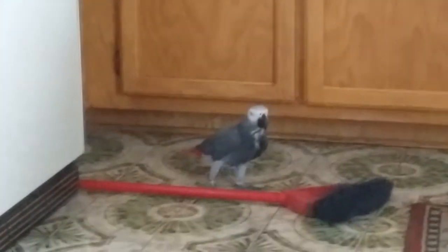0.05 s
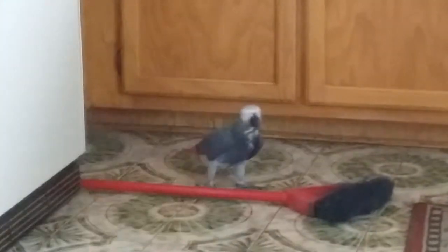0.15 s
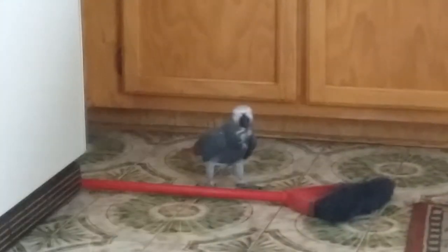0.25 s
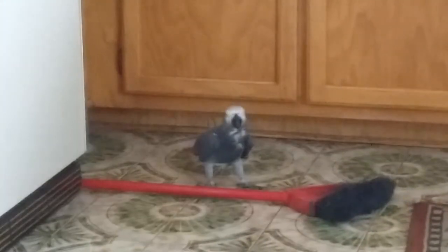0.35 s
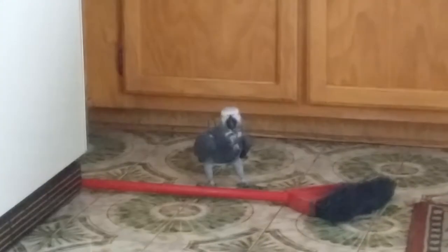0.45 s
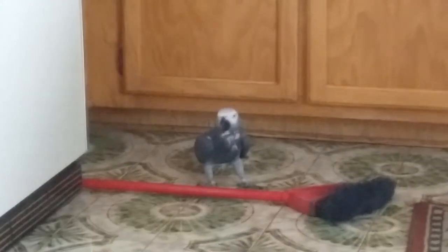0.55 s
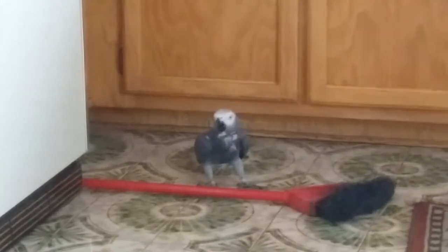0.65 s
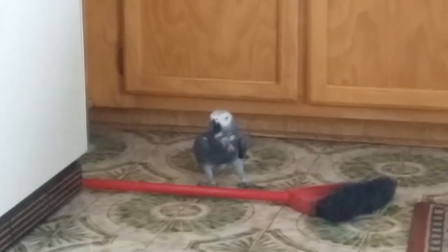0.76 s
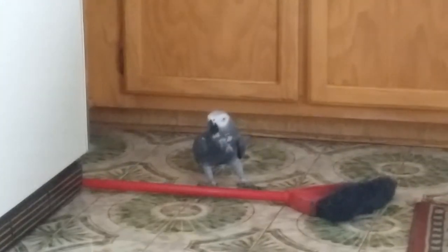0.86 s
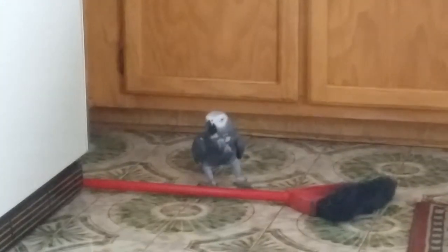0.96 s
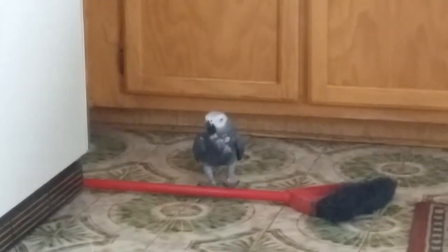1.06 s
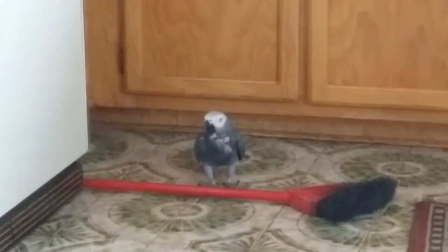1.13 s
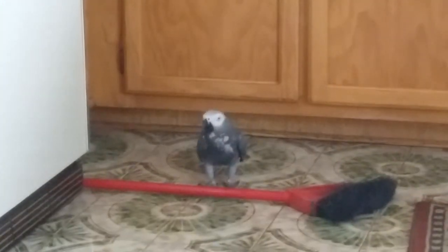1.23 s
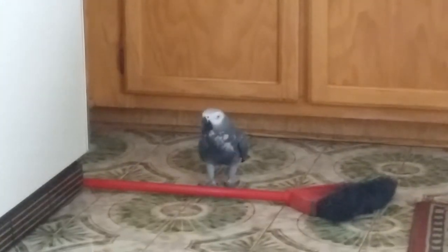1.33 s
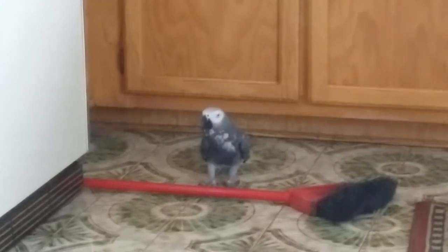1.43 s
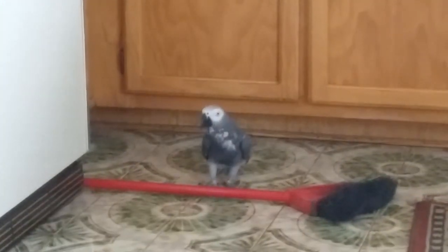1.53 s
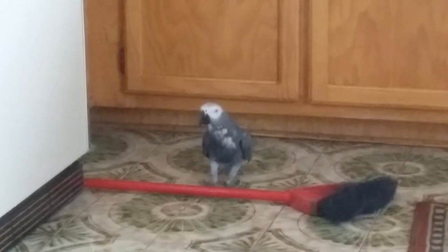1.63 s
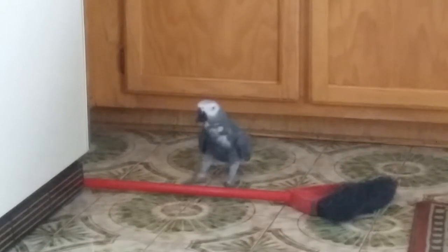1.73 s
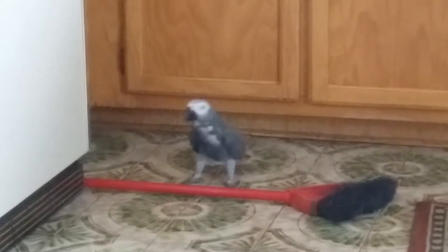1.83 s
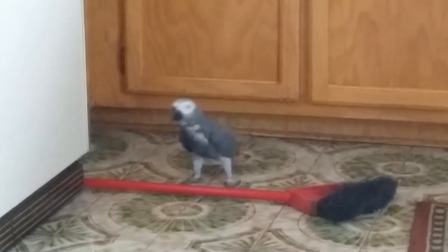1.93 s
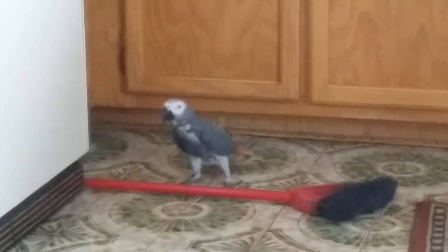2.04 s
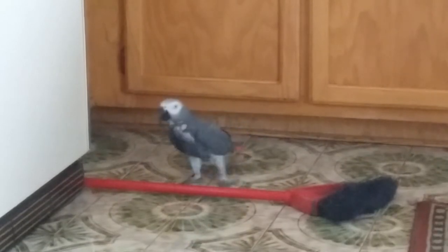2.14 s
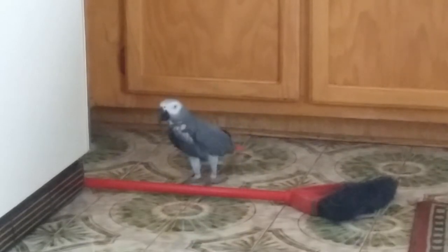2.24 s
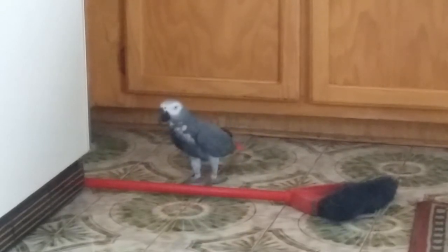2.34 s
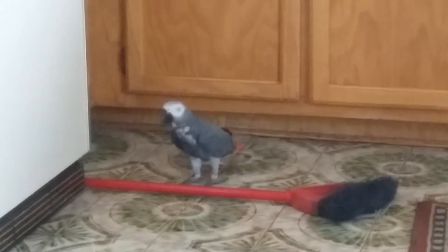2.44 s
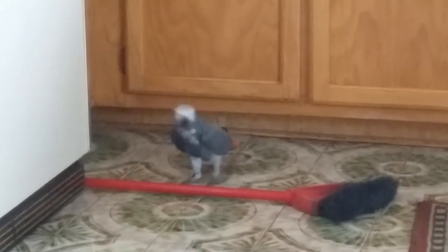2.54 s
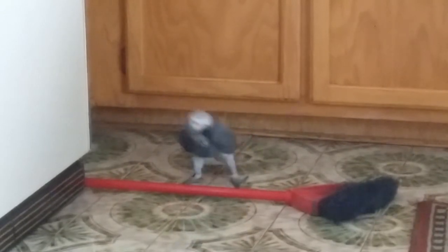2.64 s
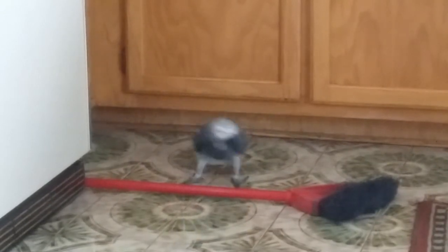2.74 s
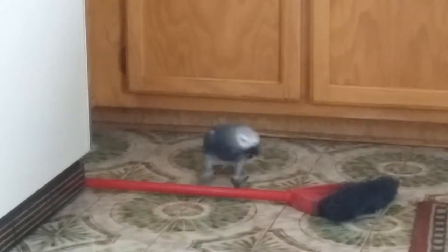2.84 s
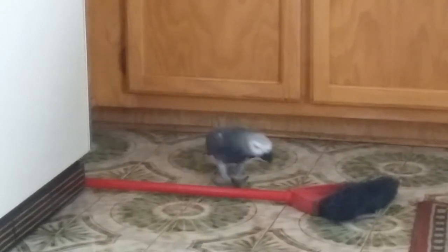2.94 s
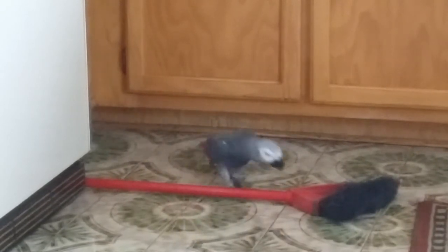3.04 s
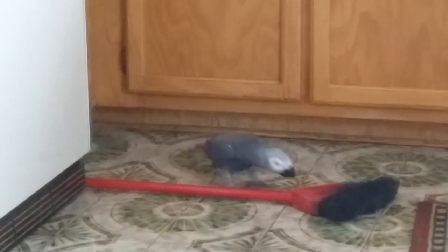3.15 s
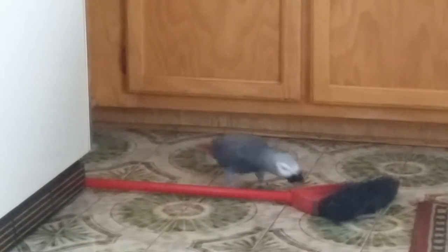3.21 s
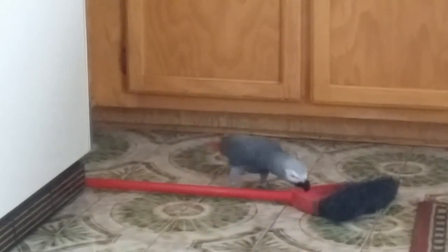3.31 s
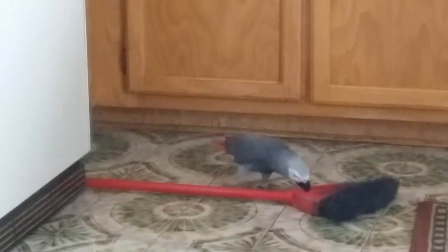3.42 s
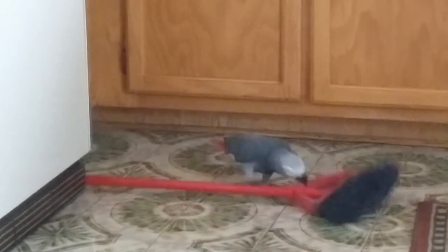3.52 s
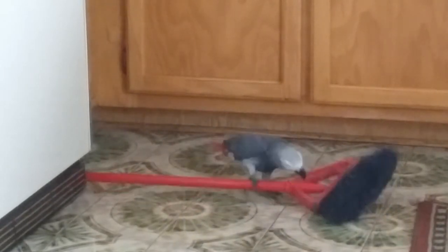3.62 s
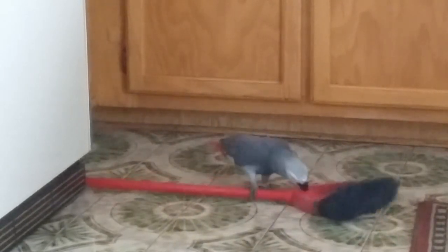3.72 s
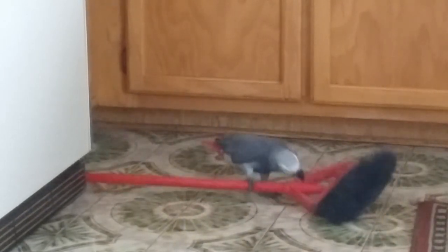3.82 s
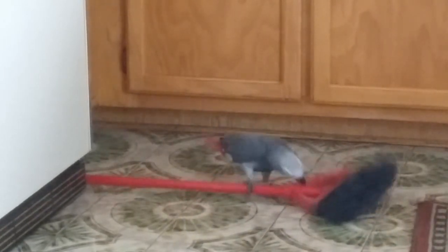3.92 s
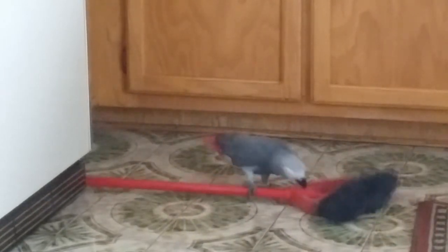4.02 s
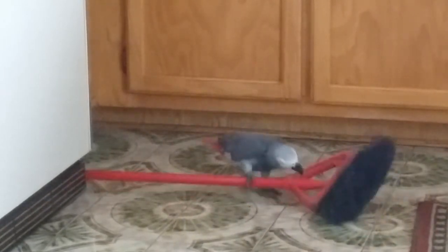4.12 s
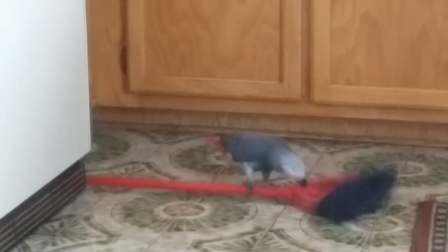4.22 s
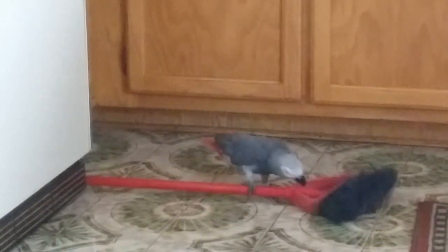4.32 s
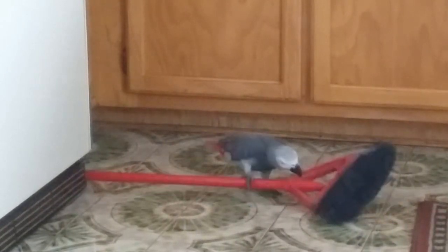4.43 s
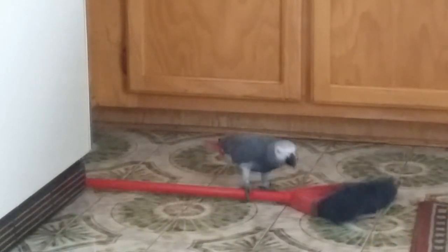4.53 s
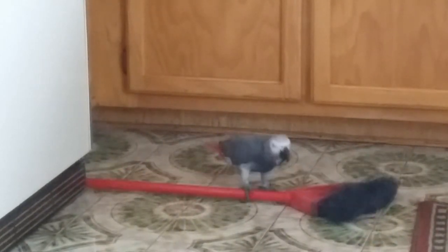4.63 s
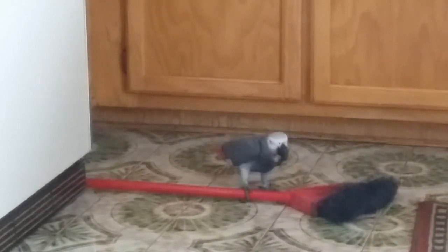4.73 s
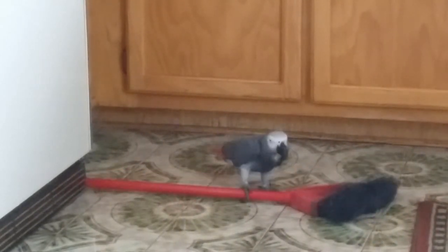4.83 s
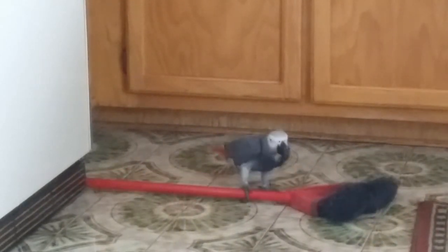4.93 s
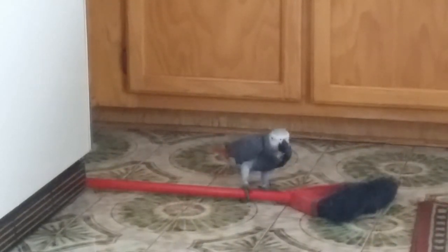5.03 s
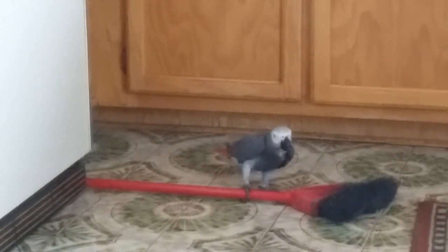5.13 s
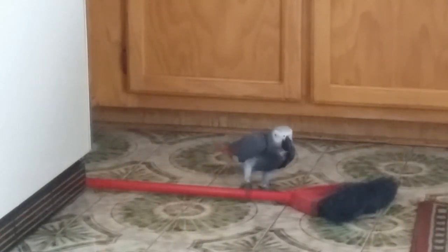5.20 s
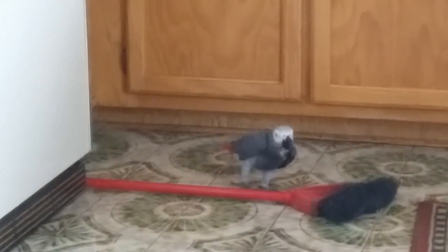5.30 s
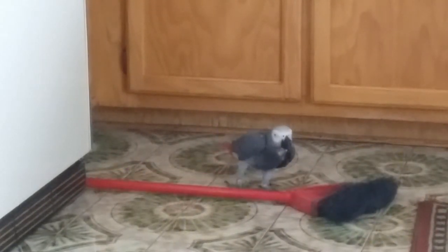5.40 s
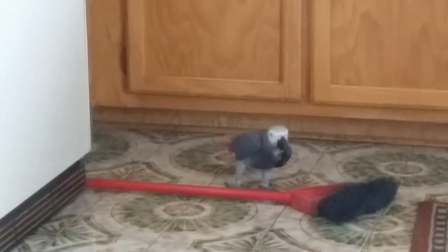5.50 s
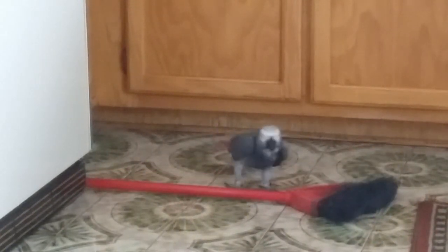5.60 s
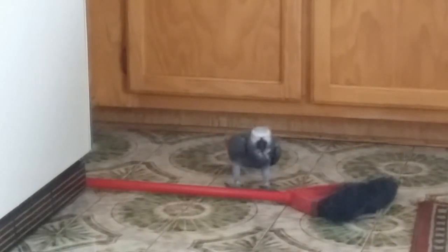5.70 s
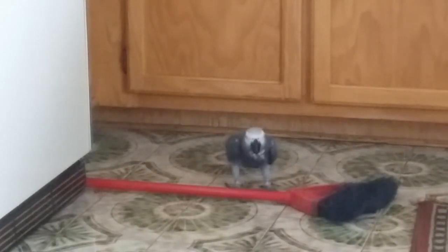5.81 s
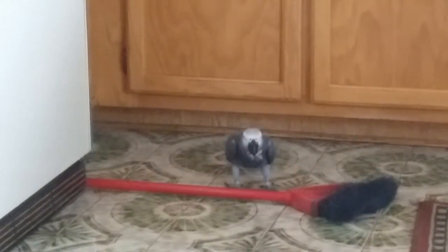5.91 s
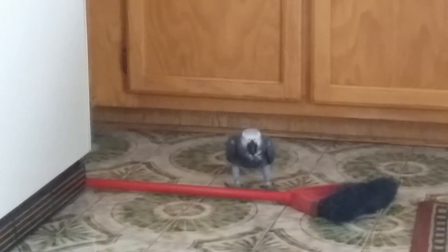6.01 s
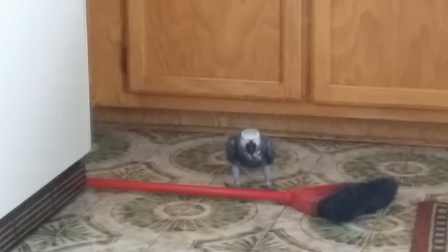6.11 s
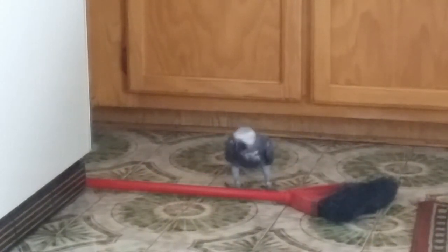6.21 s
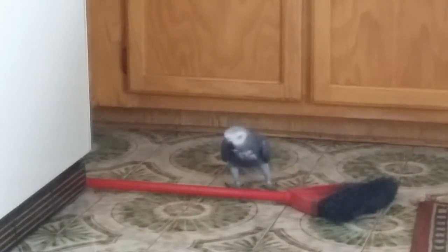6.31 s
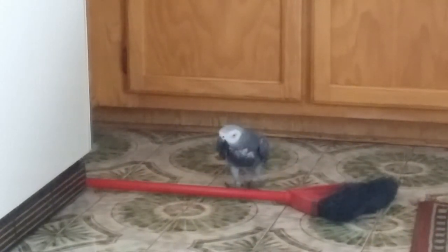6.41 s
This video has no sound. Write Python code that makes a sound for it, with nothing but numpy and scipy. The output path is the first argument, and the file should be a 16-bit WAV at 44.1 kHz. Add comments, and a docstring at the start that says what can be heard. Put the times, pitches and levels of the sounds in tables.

```python
"""Parrot and broom on a kitchen floor

Place: a hard-walled kitchen, where a parrot on the floor pecks and tugs at a plastic broom: a rattle, then
four loud knocks, each a dull modal thump and a sharp modal crack, sent through the room's reflections.
Before that, light clinks ring across the room and dry ticks, with no room on them, sit near the microphone.
Sine tones and shaped noise make the appliance hum and hiss; the gain control ducks and slowly recovers."""
import sys
import numpy as np
from scipy import signal
from scipy.fft import rfft, irfft
from scipy.io import wavfile
from scipy.ndimage import uniform_filter1d, minimum_filter1d

SR = 44100
rng = np.random.default_rng(int(sys.argv[2]) if len(sys.argv) > 2 else 0)


def master(y):
    """Save y as 16-bit WAV."""
    cut = np.clip(np.atleast_2d(y).T, -1, 1)
    pcm = np.round(cut * 32767)  # scale
    wavfile.write(sys.argv[1], SR, pcm.astype(np.int16))


N = 284797

# shapes of the background noise: [f/Hz, relative power density/dB]
RUMBLE_SPECTRUM = [(18, -74), (30, -42), (40, -26), (54, -19.5), (113, -4.5), (147, -7.5), (177, -0.5),
                   (249, -7), (281, -8), (360, -11), (395, -5.5), (498, -17), (732, -13.5), (937, -17.5),
                   (1200, -30.5), (1560, -63), (2640, -120)]
HISS_SPECTRUM = [(590, -43), (1000, -21), (1140, -6), (2100, -6), (2300, -8), (2850, -8.5), (3830, -10.5),
                 (4580, -10), (4790, -5.5), (5250, -4), (6010, 2), (7610, -13), (12100, -23), (14000, -29),
                 (14800, -27)]
# steady appliance tones: [f/Hz, middle level/dB]
HUM_TONES = [(120.3, -56), (177.4, -54), (279.9, -57), (328.4, -58.5), (4950, -64)]
# decay of the kitchen: [f/Hz, t60/s, tail level/dB]
ROOM_DECAY = [(150, 0.89, 9), (530, 0.77, 12), (1400, 0.66, 11.5), (3400, 0.69, 13), (5660, 0.66, 11),
              (9700, 0.54, 18), (14200, 0.28, 9)]
# first wall echoes after the direct sound: [t/s, level before the low-pass/dB]
WALL_ECHOES = [(.0072, -14), (0.0183, -5.5), (0.0204, -8), (.0450, -7.5)]
# narrow resonances that ring in every tail: [f/Hz, level/dB]
RINGING_MODES = [(772, -49), (960, -51), (1197, -62), (1584, -50), (1642, -46), (1848, -65), (2110, -61),
                 (2176, -62), (2401, -55), (2767, -53), (2920, -56), (4320, -54), (5817, -59), (6360, -47)]
# dry ticks close to the microphone: [t/s, peak level before the low-pass/dB, number of contacts]
TICK_TIMES = [(0.0193, -18, 1), (0.1711, -11.5, 1), (0.463, -11, 4)]
# modes of a tick: [f/Hz, width/Hz, relative level/dB]
TICK_MODES = [(1970, 900, -24), (3670, 7400, 18), (6100, 3000, 23), (8800, 3000, -15)]
# clinks across the room: [t/s, ring level/dB, snap level/dB, brightness/(dB per octave)]
CLINK_TIMES = [(1.206, -53, -25.5, 5.5), (1.336, -36, -24.5, -2), (1.606, -39, -46, -18),
               (1.704, -27, -25.5, -1), (1.927, -30.5, -18.5, 2), (1.955, -32, -20, 2),
               (2.042, -22, -6.5, 1), (2.413, -36.5, -24.5, 11), (2.593, -42, -30, -5),
               (2.666, -45, -26.5, 10), (2.890, -32, -29, 0)]
# low and high modes of what clinks: [f/Hz, width/Hz, relative level/dB]
CLINK_RING_MODES = [(1270, 98, -6.5), (1480, 37, -0.5), (2380, 870, -11.5), (3200, 61, 5), (4320, 89, 0)]
CLINK_SNAP_MODES = [(2960, 820, -13), (4650, 230, -2), (5190, 216, 1.5), (5900, 294, 1), (6770, 670, -5),
                    (7440, 255, -7), (8230, 510, -17), (9160, 280, -24.5), (10870, 370, -19),
                    (11450, 400, -22.5), (12530, 400, -21)]
# beak on broom, levels before low-pass and room: [t/s, thump level/dB, thump f/Hz, crack level/dB]
PECK_TIMES = [(3.601, -44, 1000, -20.5), (3.6245, -38, 750, -13), (3.646, -29.5, 536, -33),
              (3.8165, -8.5, 1163, -5), (4.0727, -2.5, 1480, -3), (4.203, -21.5, 790, -18),
              (4.3560, 3.5, 1900, 5), (4.6257, 0.5, 2100, 5)]
# modes of the floor, of the hollow broom head and of its hard rim: [f/Hz, width/Hz, relative level/dB]
FLOOR_MODES = [(118, 35, -5.5), (215, 65, -3.5), (540, 266, -2), (798, 206, 0), (1018, 140, -1),
               (1171, 187, -1.5)]
SHELL_MODES = [(1315, 200, -6.5), (1600, 460, -1.5), (2150, 550, 3), (2466, 420, 3), (2926, 340, 2.5),
               (3670, 670, -0.5), (4410, 420, 2.5), (4890, 680, 0)]
RIM_MODES = [(5890, 413, 1), (6110, 300, 1), (6303, 380, -1), (7280, 2800, -19), (8740, 490, -16.5)]

# background levels, rms
RUMBLE_DB, HISS_DB = -40.71, -43.5
# gap and loss from one contact of a tick to the next, then the stretch and level of the faint patter
CHATTER_S, CHATTER_LOSS_DB = 0.004, 5
PATTER_FROM_S, PATTER_TO_S, PATTER_DB = 0.033, 0.15, -23
# the ring is duller than the snap (dB per octave) and shares part of its brightness
RING_TILT_DB, RING_TILT_FOLLOWS = -3.5, 0.18
# a middling contact: pitch, mode width as a share of it, and growth of that share with pitch (exponent)
CONTACT_HZ, DAMPING, DAMPING_POWER = 1540, 0.41, 1.3
# floor thud: dB per octave at the middling contact, and its rise per octave of pitch
THUD_TILT_DB, THUD_TILT_RISE_DB = 0.5, 3
# thud level under a 0 dB thump, and its dB per dB of thump
THUD_DB, THUD_FOLLOWS = -7.5, 0.53
# shell level at a 0 dB crack, and its dB per dB of crack
SHELL_DB, SHELL_FOLLOWS = -1, 1.3
REBOUND_S = 0.0061  # from each thump to its crack
CUTOFF_HZ = 14650  # top of the recorded band


def from_db(db):
    """Decibels to amplitude gain."""
    return 10 ** (np.asarray(db) / 20)


def rms_one(x):
    """Scale to unit rms."""
    return x / np.sqrt(np.mean(x ** 2) + 1e-20)


def at_hz(table, hz, axis=1):
    """Read one column of a table on a log-frequency axis."""
    table = np.array(table)
    return np.interp(np.log(np.maximum(hz, 1)), np.log(table[:, 0]), table[:, axis])


def add(track, s, sound):
    """Mix a sound into a track at a time in seconds."""
    at = max(round(s * SR), 0)
    track[at:at + len(sound)] += sound[:len(track) - at]


def low_pass(x, cut_hz, order=2):
    """Low-pass: takes off the treble above a cutoff."""
    sos = signal.butter(order, min(cut_hz, SR / 2 - 500), fs=SR, output="sos")
    return signal.sosfilt(sos, x)


def strike(modes, tilt_db=0, size=4096):
    """One blow on damped modes of alternating sign; a positive tilt favours the high ones; peak 1."""
    hz, width, db = np.array(modes, float).T[:, :, None]
    t = np.arange(size) / SR
    signs = np.cos(np.pi * np.arange(len(hz)))[:, None]
    tilted_db = db + tilt_db * np.log2(hz / hz[0])
    height = signs * width * from_db(tilted_db)
    decay = np.exp(-np.pi * width * t)
    ring = np.sum(height * decay * np.sin(2 * np.pi * hz * t) / hz, axis=0)
    pressure = np.diff(ring, prepend=0)  # the air follows the speed of the surface
    return pressure / np.abs(pressure).max()


def coloured_noise(spectrum):
    """Steady noise of a given spectrum, rms 1."""
    hz = np.arange(N // 2 + 1) * SR / N
    white = rfft(rng.standard_normal(N))
    return rms_one(irfft(white * from_db(at_hz(spectrum, hz)), N))


def drift(rate_hz):
    """Slow random wander, rms 1: noise that falls away above a rate."""
    hz = np.arange(N // 2 + 1) * SR / N
    white = rfft(rng.standard_normal(N))
    return rms_one(irfft(white / (1 + (hz / rate_hz) ** 2), N))


def background(waver_db=5.5, phase_wander=1.0):
    """An appliance rumbles and hums in tones of wandering level and phase (rad), under an even hiss."""
    t = np.arange(N) / SR
    tones = np.zeros(N)
    for hz, db in HUM_TONES:
        level = from_db(db + waver_db * drift(3.5))
        phase = 2 * np.pi * hz * t + phase_wander * drift(2.8)
        tones += level * np.sqrt(2) * np.sin(phase)
    rumble = from_db(RUMBLE_DB) * coloured_noise(RUMBLE_SPECTRUM)
    hiss = from_db(HISS_DB) * coloured_noise(HISS_SPECTRUM)
    return tones + rumble + hiss


def kitchen(sound, spot, moved=0.63, build_s=0.00068, mixing_s=0.027, wall_cut_hz=8000):
    """Direct sound, a few dull wall echoes, narrow ringing modes, and a dense tail that dies band by band."""
    size = len(spot)
    t, hz = np.arange(size) / SR, np.arange(size // 2 + 1) * SR / size
    response = np.zeros(size)
    for delay_s, db in WALL_ECHOES:
        response[round(delay_s * SR)] += from_db(db)
    response = low_pass(response, wall_cut_hz)
    response[0] += 1  # direct sound
    age = np.hypot(t, mixing_s) - mixing_s  # the level holds while the sound spreads through the room

    def fade(at):
        """Rise and decay of the tail at one frequency."""
        decay = np.exp(-np.log(1000) * age / at_hz(ROOM_DECAY, at))
        return decay * (1 - np.exp(-t / build_s))

    for wave_hz, db in RINGING_MODES:
        response += from_db(db) * fade(wave_hz) * np.sin(2 * np.pi * wave_hz * t)
    # each spot has its own pattern of reflections, which shifts a little from blow to blow
    white = rfft(spot + moved * rng.standard_normal(size))
    edges_hz = [40, 200, 400, 800, 1600, 3000, 5000, 7500, 10500, 16000]
    for low, high in zip(edges_hz, edges_hz[1:]):
        centre = np.sqrt(low * high)
        noise = irfft(white * ((hz >= low) & (hz < high)), size)
        band = rms_one(noise * fade(centre))
        share = np.sqrt(2 * (high - low) / (SR * size))  # wider bands carry more power
        response += from_db(at_hz(ROOM_DECAY, centre, axis=2)) * band * share
    return signal.fftconvolve(sound, response)


def ticks(cut_hz=11500):
    """Tiny modal clicks, so close that the room does not answer: some clear, some chattering, a faint patter."""
    out = np.zeros(N)
    tick = strike(TICK_MODES)
    for s, db, count in TICK_TIMES:
        for k in range(round(count)):
            add(out, s + k * CHATTER_S, from_db(db - k * CHATTER_LOSS_DB) * tick)
    for s in PATTER_FROM_S + (PATTER_TO_S - PATTER_FROM_S) * rng.random(size=5):
        add(out, s, from_db(PATTER_DB) * tick)
    return low_pass(out, cut_hz, order=4)


def clinks(spot, ring_cut_hz=6000, cut_hz=12800):
    """Light taps across the room excite something small and hard: a low ring and a bright snap."""
    out = np.zeros(N)
    for s, ring_db, snap_db, tilt_db in CLINK_TIMES:
        ring_tilt_db = RING_TILT_DB + RING_TILT_FOLLOWS * tilt_db
        ring = from_db(ring_db) * low_pass(strike(CLINK_RING_MODES, ring_tilt_db), ring_cut_hz)
        snap = from_db(snap_db) * strike(CLINK_SNAP_MODES, tilt_db)
        clink = low_pass(ring + snap, cut_hz, order=8)
        add(out, s, kitchen(clink, spot))
    return out


def pecks(spot, thump_cut_hz=3300, thud_cut_hz=1500, crack_cut_hz=8400, near_thump_db=-3):
    """The broom thumps on the floor, and a few milliseconds later the hard plastic cracks."""
    out = np.zeros(N)
    for s, thump_db, hz, crack_db in PECK_TIMES:
        # a stiffer contact has a higher pitch, dies sooner and thuds brighter on the floor
        stiffness = hz / CONTACT_HZ
        width_hz = hz * DAMPING * stiffness ** DAMPING_POWER
        thump = from_db(thump_db) * low_pass(strike([(hz, width_hz, 0)]), thump_cut_hz, order=4)

        thud_db = THUD_DB + THUD_FOLLOWS * thump_db
        thud_tilt_db = THUD_TILT_DB + THUD_TILT_RISE_DB * np.log2(stiffness)
        thud = from_db(thud_db) * low_pass(strike(FLOOR_MODES, thud_tilt_db), thud_cut_hz)

        shell_db = SHELL_DB + SHELL_FOLLOWS * crack_db
        crack = from_db(crack_db) * strike(RIM_MODES) + from_db(shell_db) * strike(SHELL_MODES)

        knock = thump + thud
        add(knock, REBOUND_S, low_pass(crack, crack_cut_hz, order=8))
        add(out, s, kitchen(knock, spot))
        # extra direct thump, without room: low notes arrive stronger straight from the source
        add(out, s, from_db(near_thump_db) * thump)
    return out


def scene():
    """Broom and clinks fill the room, each from its own spot; ticks and background reach the mic as they are."""
    broom_spot, clink_spot = rng.standard_normal(size=(2, 32768))
    mix = pecks(broom_spot) + clinks(clink_spot) + ticks() + background()
    return mix[None]


def gain_control(x, threshold_db=-17.0, slope=0.62, hold_s=0.69, release_db_per_s=13):
    """Loud sound turns the gain down at once; it stays down for a while, then creeps back."""
    power = uniform_filter1d(x ** 2, size=1024)
    level_db = 10 * np.log10(np.maximum(power, 1e-12))
    cut_db = slope * np.maximum(level_db - threshold_db, 0)
    # hold: the deepest cut of the last hold_s
    half = int(hold_s * SR / 2)
    held_db = -minimum_filter1d(-cut_db, 2 * half + 1, origin=half)
    # release: the cut may shrink no faster than this ramp
    ramp_db = release_db_per_s * np.arange(N) / SR
    released_db = np.maximum.accumulate(held_db + ramp_db) - ramp_db
    return x * from_db(-uniform_filter1d(released_db, size=128))


def record(dry):
    """Recorder behind the microphone: gain control, a ceiling that clips peaks, a steep cut of the top."""
    limited = np.clip(gain_control(dry[0]), -0.93, 0.93)
    top_cut = signal.ellip(10, 0.1, 80, CUTOFF_HZ, fs=SR, output="sos")
    return signal.sosfilt(top_cut, limited)[None]


dry = scene()
out = record(dry)
master(out)
```